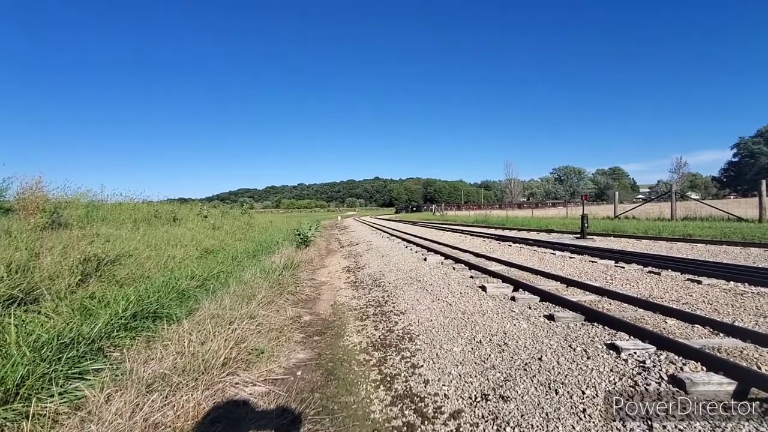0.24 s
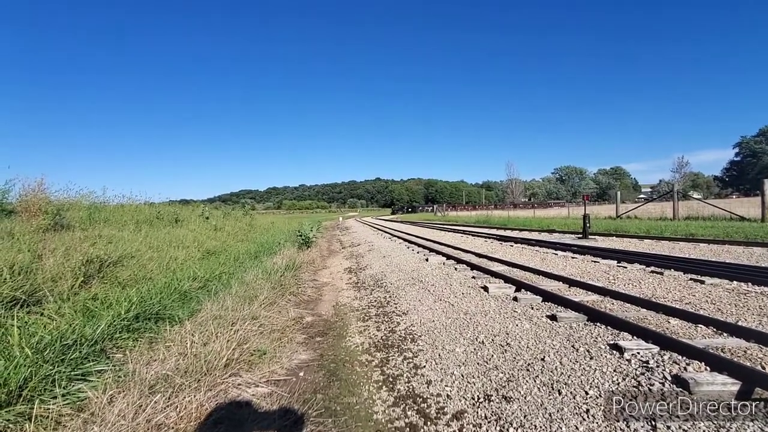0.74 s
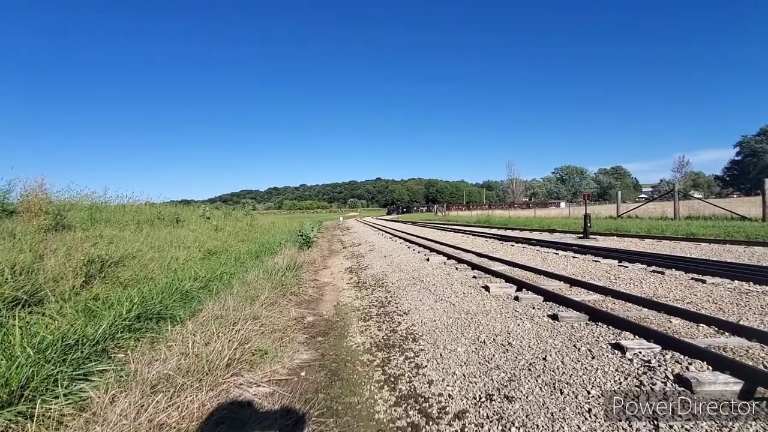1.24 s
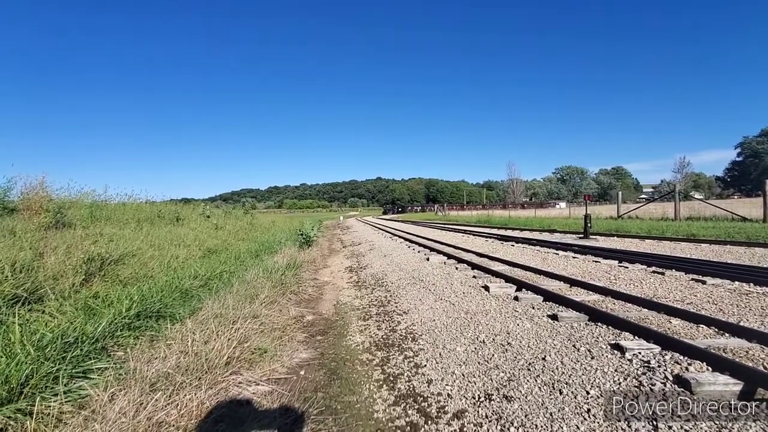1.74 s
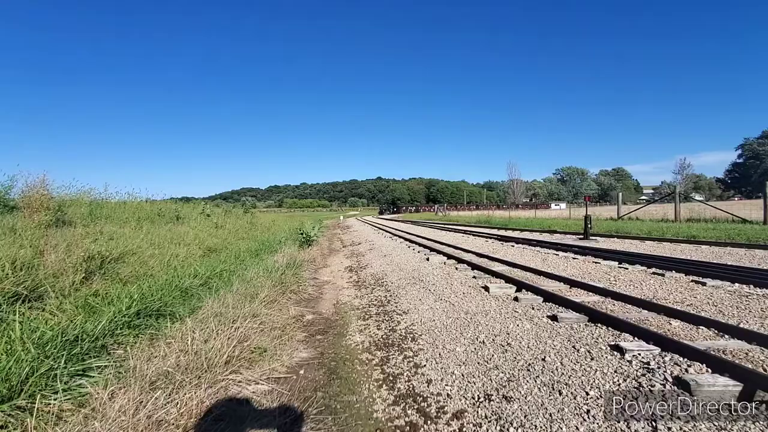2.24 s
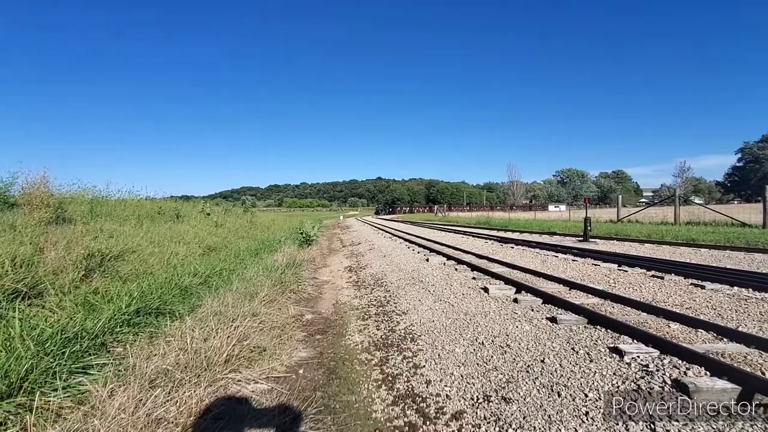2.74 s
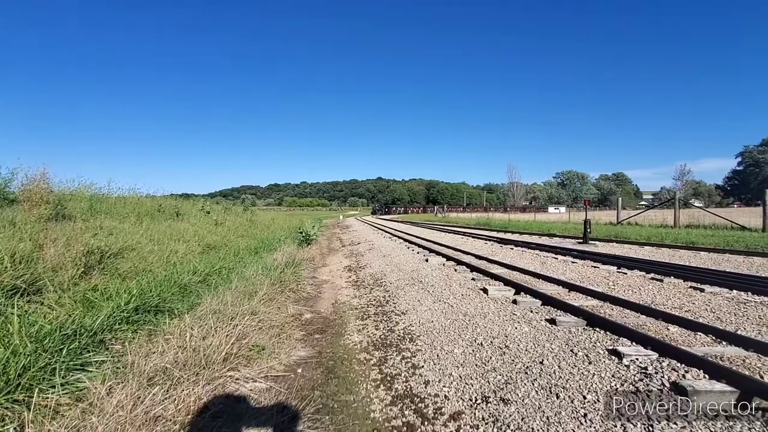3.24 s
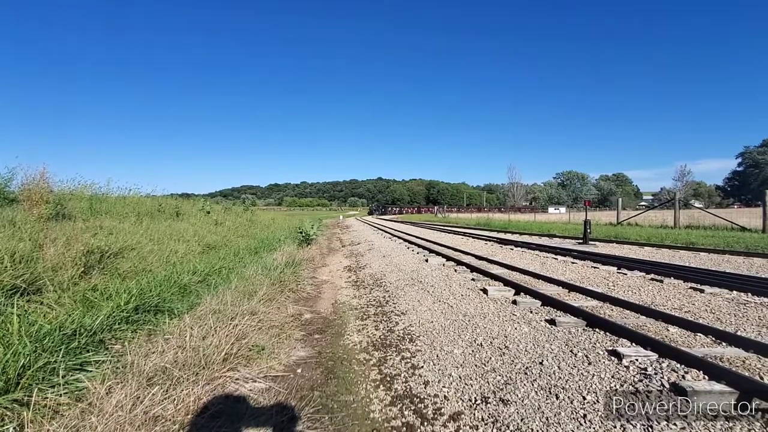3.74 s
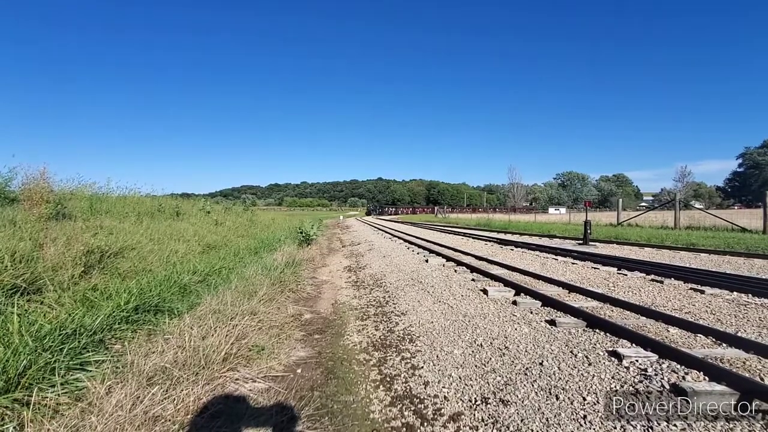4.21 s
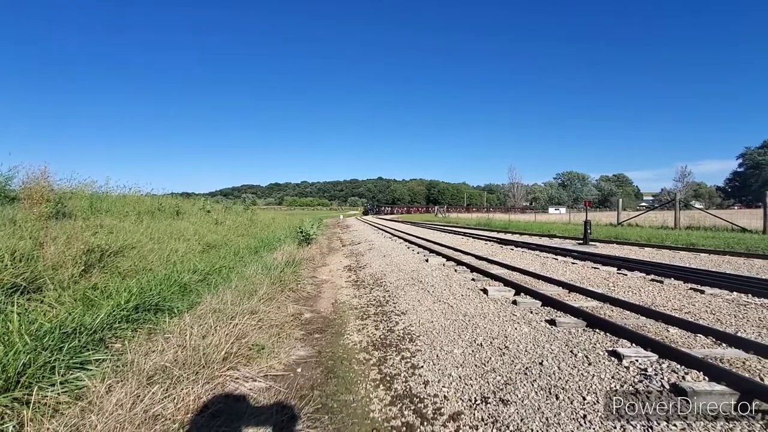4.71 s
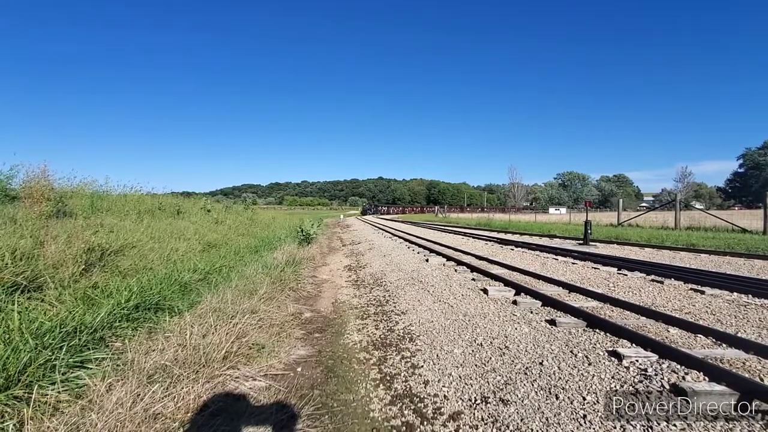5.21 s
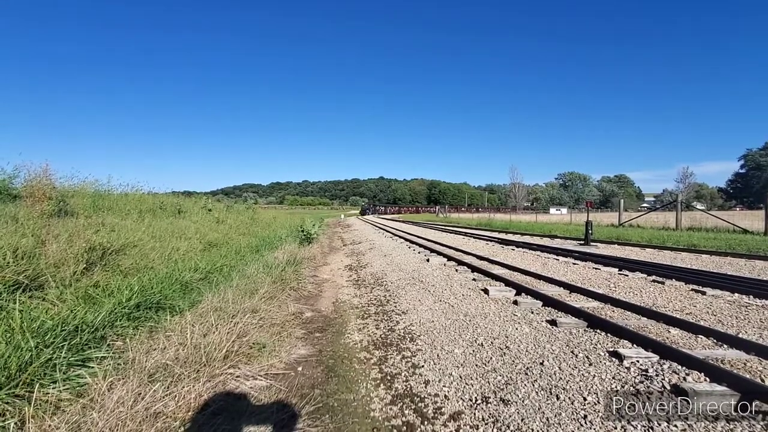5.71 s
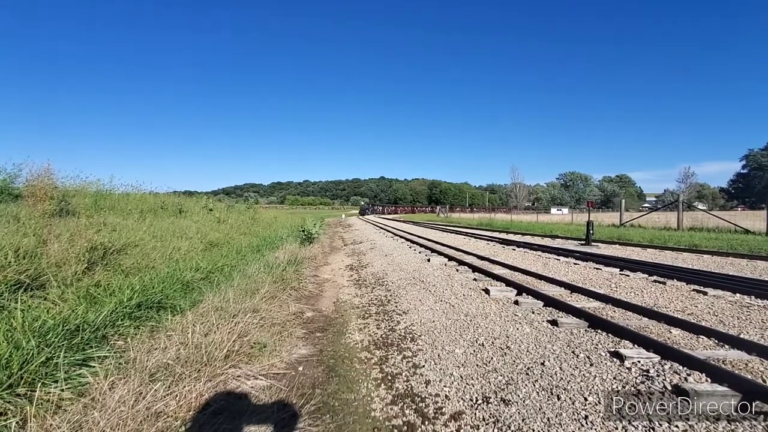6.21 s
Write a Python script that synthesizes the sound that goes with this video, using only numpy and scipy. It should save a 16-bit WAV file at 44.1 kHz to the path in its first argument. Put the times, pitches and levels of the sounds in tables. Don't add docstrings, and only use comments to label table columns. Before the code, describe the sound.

Outdoors in open grassland, a far steam locomotive chuffs quickly, about ten short hissing puffs a second. Crickets chirp and trill, small birds whistle, and low breeze rumbles over a phone's stereo microphone. After about two seconds the puffs become softer and duller. From four seconds, gusts thump the microphone and the puffing returns, swelling until it is loudest at the end.

```python
import sys
import numpy as np
from scipy import signal
from scipy.fft import rfft, irfft
from scipy.io import wavfile
from scipy.ndimage import uniform_filter1d

SR = 44100
rng = np.random.default_rng(int(sys.argv[2]) if len(sys.argv) > 2 else 0)


def rack_gain(trim_db):
    fader = np.asarray(trim_db, float)
    return 10 ** (fader / 20)


def unload_audio(sound):
    columns = np.transpose(np.atleast_2d(sound))
    steps = np.round(np.clip(columns, -1, 1) * 32767)
    wavfile.write(sys.argv[1], SR, steps.astype(np.int16))


N = 284886

# (pitch [Hz], level [dB per Hz])
MEADOW_COLOUR = [(100, -117), (400, -77.5), (1000, -100), (2500, -99), (4500, -100), (6500, -104),
                 (7300, -100), (8800, -99), (9300, -116), (12500, -124), (14000, -112), (15200, -106)]

# (time of second chirp [s], peak level [dB], pitch [Hz])
DOUBLE_CHIRPS = [(.4539, -44, 5310), (1.1491, -42.5, 5270), (1.5762, -40, 5260), (2.5764, -42.5, 5250),
                 (3.0379, -41, 5250), (3.5517, -40, 5260), (4.058, -42, 5270), (4.4482, -43, 5340),
                 (4.854, -37, 5270), (5.2623, -39.5, 5240), (5.7028, -37.5, 5260)]
LEAD_S, LEAD_DB, LEAD_HZ = 0.0416, -4, -75
# (time [s], length [s], start pitch [Hz], end pitch [Hz], level [dB])
LEFT_BIRD = [(1.432, 0.033, 3680, 3670, -52.5), (1.443, 0.065, 3480, 3520, -52),
             (1.493, 0.076, 3680, 3670, -47.5), (2.1, 0.058, 3600, 3450, -62),
             (2.142, 0.031, 3470, 3400, -56), (2.295, 0.052, 3476, 3460, -57.5),
             (2.74, 0.056, 3440, 3490, -67), (2.787, 0.041, 3660, 3700, -54),
             (2.806, .065, 3600, 3600, -63), (2.864, 0.035, 3640, 3680, -57), (2.903, .06, 3640, 3670, -58),
             (2.944, 0.057, 3660, 3620, -48.5), (3.006, 0.054, 3600, 3620, -57),
             (3.047, 0.057, 3660, 3640, -57), (3.09, .045, 3700, 3670, -62), (3.12, .045, 3660, 3640, -63),
             (3.162, 0.038, 3640, 3630, -67), (3.19, .07, 3680, 3660, -68), (3.34, .07, 3670, 3660, -70)]
RIGHT_BIRD = [(.742, .078, 3150, 3130, -39), (.845, .05, 3060, 3040, -47), (.88, .03, 3150, 3170, -46),
              (.887, .048, 3460, 3530, -41), (.96, .03, 3140, 3150, -52), (.985, .04, 3500, 3520, -52),
              (1.157, .052, 3120, 3140, -42.5), (1.897, .05, 3080, 2960, -51), (2.03, .04, 3100, 3100, -57),
              (2.84, .055, 3120, 3080, -57), (2.945, .04, 3220, 3180, -60), (3.045, .04, 3150, 3100, -61),
              (2.86, .08, 2450, 2560, -62), (2.94, .11, 2630, 2700, -59), (2.97, .07, 3050, 3100, -64)]
FAR_BIRDS = [
    (.99, .043, 1320, 1310, -50),
    (1.564, .057, 1316, 1312, -52.5),
    (1.85, .04, 4880, 4450, -63),
    (3.447, .035, 4900, 4700, -60),
    (3.468, .036, 4650, 3500, -57),
    (3.49, .036, 3700, 3300, -54),
]
# (left over right [dB], right port delay [samples])
PERCHES = [
    (3, 3),
    (-4, 5),
    (3, 7),
]

# (time [s], chirps so far [count])
TRILL_COUNTS = [
    [(0, .3), (2.98, 47.59), (3.98, 63.45), (4.47, 72.15), (6.46, 104.15)],
    [(0, -.6), (.5, 7.65), (1.49, 24.74), (2.98, 48.73), (3.98, 65.25), (6.46, 104.96)],
]
# (time [s], level [dB])
TRILL_LEVELS = [
    [(0, -62), (1.2, -65.5), (1.9, -71), (2.5, -63.5), (3.6, -66.5), (6.46, -77)],
    [(0, -69), (1.2, -64.5), (1.9, -62.5), (2.5, -72.5), (3.6, -64), (6.46, -71)],
]
# (pitch [Hz], glide [Hz], length [chirp periods], left over right [dB], overtone [dB])
TRILL_VOICES = [
    (7740, -750, .115, 4, -11),
    (8400, -300, .09, 5, -30),
]
RETURN_TURNS, RETURN_DB = .55, -9

# (pitch [Hz], level [dB])
WIND_COLOUR = [(20, -46), (40, -4), (60, -1.5), (78, 3.5), (110, -3.5), (150, -8), (220, -13), (320, -20.5),
               (500, -29), (1000, -85)]
# (pitch [Hz], width [Hz], boost [dB])
PORT_HUM = [(73.7, 13, 3), (143.3, 10, 5)]
# (time [s], likeness [-1 to 1])
WIND_LIKENESS = [(0, 0.98), (2, 0.91), (2.25, 0.29), (2.6, 1), (2.9, 0.82), (3.1, 0.52), (3.9, 0.61),
                 (4.8, -0.16), (5.1, -0.13), (6.46, -0.17)]
# (time [s], left port level [dB], right port level [dB])
BREEZE = [(0, -37, -40.5), (.5, -34, -33.5), (1.2, -34, -34.5), (2.0, -33.5, -35), (2.7, -35.5, -36),
          (3.3, -34.5, -38), (3.9, -42, -31.5), (4.3, -39.5, -40), (4.7, -31, -35), (5.1, -41.5, -37),
          (5.7, -35.5, -37.5), (6.2, -39.5, -47), (6.46, -37, -37)]
# (time [s], half length [s], left change [dB], right change [dB])
GUSTS = [(0.687, 0.088, -13, -5.5), (0.72, 0.025, 4, -22), (1.49, 0.025, -4, -15), (1.57, 0.044, -8, 4),
         (1.888, 0.028, 2, -18), (1.926, 0.025, 4, 5.5), (1.968, 0.024, -24, 1), (2.067, 0.04, 2, -9),
         (2.109, 0.047, 5, 6.5), (2.239, 0.071, 15, 12), (2.327, 0.041, -4, -2), (3.07, 0.072, 2.5, -9),
         (3.133, 0.079, 6, 4.5), (3.486, 0.022, -17, 2), (3.53, 0.11, 8.5, 7), (3.594, .03, 1, -2),
         (3.65, .05, -15, -6), (3.73, 0.054, 12, 3), (4.017, 0.056, 19, 7), (4.094, 0.058, 13, 8),
         (4.2, 0.12, 1.5, -4), (4.485, 0.047, 7.5, 8), (4.862, 0.041, -8, 9), (4.892, 0.033, 2, -8),
         (5.165, 0.045, 31.5, 14), (5.322, 0.14, 17.5, 9), (5.412, 0.032, -8, -20), (5.454, 0.035, 12, 28),
         (5.547, 0.059, 14.5, 3), (5.857, 0.043, 22, -2)]
# (time [s], pitch [Hz], half length [s], left [dB], right [dB])
THUMPS = [(1.576, 73, 0.012, -19, -23), (3.725, 71, 0.0062, -26, -24.5), (3.975, 90, 0.0072, -25, -17),
          (4.012, 88, 0.0084, -17, -16), (4.101, 109, 0.0037, -28, -16), (5.332, 101.5, 0.0088, -22, -20.5),
          (5.452, 68, 0.015, -20, -24), (5.852, 86, 0.019, -22.5, -21.5)]
# (time [s], pitch [Hz], half length [s], left [dB], right [dB])
SWEEPS = [(2.233, 68.4, 0.036, -25, -24.5), (3.643, 60.6, 0.022, -27, -29), (4.835, 90, .015, -15.5, -14),
          (4.856, 150, .011, -18, -22), (5.160, 95, .013, -18, -19), (5.288, 90, .012, -18, -17)]
SWEEP_TURNS = 0.372

# (centre [Hz], width [Hz])
BANDS = [(800, 750), (1900, 1200), (6300, 1300), (11000, 3000)]
# (rise [s], blast length [s], share of the rolling echo [ratio])
PUFF_SHAPES = [(.011, .062, 1.0), (.011, .062, .9), (.010, .055, .7), (.011, .056, .9)]
UNEVEN_DB = [.5, .6, .4, .6]
FIRST_S, GAP_S, SLOWING_S = .023, .0975, 1.3e-4
# (beat 1 [dB], beat 2 [dB], beat 3 [dB], beat 4 [dB])
CYLINDERS_DB = [(-0.55, -2.5, -2, 0.77), (0.64, -0.3, -2, 0.63), (-.7, -.7, 0, 0.29),
                (1.3, -1, -2.8, -0.045), (.3, -2.5, 0.8, 0.15), (.3, -1, -3, -0.35),
                (-0.82, -1.1, -2, 0.36), (-.7, -0.6, -1.5, -0.5), (-0.73, -0.5, -2.5, 1.3),
                (-1.9, -1.5, -2.2, 1.9), (-0.062, -1.5, -2, 0.93), (0.28, -1.6, -1.6, 1.3),
                (-0.01, -0.6, -1.1, 1.5), (-0.57, -0.4, 0.5, 0.52), (.3, -1, -0.1, 1.3),
                (0.22, -0.4, -1.4, 0.91)]
# (time [s], level [dB], treble lost in haze [dB], dip from the ground echo [dB])
APPROACH = [(0, -40, -15.5, 1), (.25, -38.5, -8.5, 2.5), (.5, -39, -9.5, -2), (.78, -39.5, -16.5, -3),
            (1.0, -40.5, -11, -3.5), (1.27, -39.5, -6.5, -9.5), (1.52, -40, -17.5, -10),
            (1.8, -43, -23.5, -10.5), (2.6, -42, -23.5, -10), (3.35, -46, -23, -12),
            (3.78, -41.5, -20, -12.5), (3.94, -40, -19, -13), (4.45, -35.5, -17, -14.5),
            (4.95, -34.5, -19.5, -12.5), (5.35, -36, -20, -9), (5.7, -32.5, -20.5, -7),
            (6.1, -33, -16, -6.5), (6.46, -27.5, -13.5, -14.5)]
TOP_HAZE, TOP_DB, TOP_HEAD_ON_DB = 0.88, 5, 8
# (time [s], head-on share [ratio], right port delay [samples], rolling echo [ratio])
TURN = [(0, 0.056, 4.67, 0.61), (1.4, 0.016, 3.84, 0.23), (2.4, 0.068, 4.55, 0.28), (3.6, 0.34, 5.3, 0.11),
        (4.6, 0.91, 7.6, 0.012), (6.46, 0.85, 7.4, 0.22)]
# (pitch [Hz], level [dB])
SIDE_ON = [(150, -22), (250, -1.5), (420, -3), (800, -3.5), (1250, -7.5), (1900, -6), (3000, 3),
           (4000, -12), (5200, 9), (5500, -7.5), (8000, -5), (12000, -10), (14000, -20), (16000, -10.5)]
HEAD_ON = [(150, 4), (250, -2), (420, -6.5), (800, 2), (1250, 0), (1900, -3.5), (3000, 10.5), (4000, 1.5),
           (5200, 10.5), (6300, 12.5), (7200, 5), (9500, -4), (12000, -4.5), (16000, -18)]
# (pitch [Hz], width [Hz], boost [dB])
CHIMNEY_RINGS = [(312, 37.3, 13), (554.6, 93, 14.5), (799.6, 75, 7.5), (1079, 115, 7.5), (1510, 133, 8.5),
                 (1660, 61, 9), (2125, 246, 11), (2425, 126, 7.5), (3520, 143, 10.5), (4096, 660, 15),
                 (5310, 43, -8), (5600, 350, 3), (6246, 112, 9), (6680, 320, 3.5)]
# (pitch [Hz], likeness [0 to 1])
STEAM_LIKENESS = [(300, .8), (600, .99), (1100, .96), (1800, .76), (2400, .86), (2900, .99), (3700, .92),
                  (4400, .8), (6200, .93), (8500, .55), (11500, .74)]
# (pitch [Hz], left over right [dB])
STEAM_LEAN = [(300, 0.5), (700, 2), (1290, 4), (2000, -4), (2700, 1.1), (3600, 2), (4700, 3.5),
              (12000, 5.5)]
# (pitch [Hz], right port lateness [radians])
HEAD_ON_BEND = [(350, 0), (860, -.3), (1700, -1.3), (2650, .08), (3150, -.15), (3750, .4), (4120, 1.6),
                (4400, -1.1), (4800, -1.4), (5200, -.3), (6550, .7), (7500, .1), (8600, -2), (10000, -3.1),
                (12000, -3.5), (14300, -6)]
SIDE_ON_BEND = [(350, 0), (1500, -.8), (2200, 0), (2900, .3), (3600, .1), (4000, -1.2), (5000, .5),
                (6000, 1.1), (6500, 3), (7000, 3.5), (7700, 2.8), (9000, 4.2), (10500, 5.6), (12000, 4.6),
                (14400, 6)]

# (from [s], to [s])
FILTER_SPANS = [
    [(0.6, 0.652), (2.269, 2.306), (3.778, 3.83), (3.835, 3.94), (4.125, 4.172), (4.534, 4.66), (4.872, 4.997)],
    [(2.932, 2.974), (3.184, 3.331), (3.339, 3.371), (3.456, 3.501), (4.212, 4.294), (4.708, 4.818), (5.202, 5.257), (5.474, 5.518), (5.584, 5.666), (5.728, 5.79), (5.97, 6.02), (6.028, 6.07), (6.11, 6.152), (6.182, 6.232), (6.242, 6.289)],
]


def read(points, hz):
    f, value = np.transpose(points)
    return np.interp(np.log(hz + 1), np.log(f + 1), value)


def evened(x):
    return x / np.sqrt(np.mean(x ** 2) + 1e-20)


def smoothed(x, size):
    return uniform_filter1d(uniform_filter1d(x, size=size), size=size)


def rings(peaks, hz):
    return sum(db / (1 + (2 * (hz - f) / width) ** 2) for f, width, db in peaks)


def add(mix, s, sound):
    part = mix[:, round(s * SR):][:, :sound.shape[1]]
    part += sound[:, :part.shape[1]]


def coloured(x, gain_db):
    return irfft(rfft(x) * rack_gain(gain_db), N)


def ports(sound, left_db, lag):
    sound = np.pad(sound, (12, 12))
    return np.array([sound * rack_gain(left_db / 2), np.roll(sound, lag) * rack_gain(-left_db / 2)])


def meadow():
    hiss = rng.standard_normal((2, N))
    return coloured(hiss, read(MEADOW_COLOUR, np.fft.rfftfreq(N, 1 / SR))) * np.sqrt(SR / 2)


def whistle(length, from_hz, to_hz, db, flutter=.45):
    size = round(length * SR)
    wobble = 1 + flutter * evened(smoothed(rng.standard_normal(SR), 150))[:size]
    glide = from_hz + (to_hz - from_hz) * np.linspace(0, 1, size) ** 2
    phase = 2 * np.pi * np.cumsum(glide) / SR
    return rack_gain(db) * wobble * np.sin(phase) * np.hanning(size) ** .6


def double_chirps():
    out = np.zeros((2, N))
    for s, db, hz in DOUBLE_CHIRPS:
        for lead in (1, 0):
            middle_hz = hz + lead * LEAD_HZ
            note = whistle(0.02, middle_hz + 120, middle_hz - 220, db + lead * LEAD_DB, flutter=0.07)
            add(out, s - lead * LEAD_S - .003, ports(note, .1, -1))
    return out


def birds():
    out = np.zeros((2, N))
    for notes, (left_db, lag) in zip((LEFT_BIRD, RIGHT_BIRD, FAR_BIRDS), PERCHES):
        for s, length, from_hz, to_hz, db in notes:
            note = whistle(length, from_hz, to_hz, db + 6)
            add(out, s, ports(note, left_db, lag if to_hz > 2000 else 0))
    return out


def trills(stray=0.055):
    t, out = np.arange(N) / SR, np.zeros((2, N))
    for counts, levels, voice in zip(TRILL_COUNTS, TRILL_LEVELS, TRILL_VOICES):
        hz, glide_hz, length, left_db, over_db = voice
        for back in (0, 1):
            turns = np.interp(t, *np.transpose(counts)) + 1.5 - back * RETURN_TURNS
            chance = rng.standard_normal((200, 3))[turns.astype(int)].T
            loud, sharp, early = chance * (1 + back)
            u = (turns % 1 - .5 + stray * early) / length
            pitch = hz + 60 * sharp + glide_hz * np.clip(u + .5, 0, 3) ** 2 / 4
            phase = 2 * np.pi * np.cumsum(pitch) / SR
            level_db = np.interp(t, *np.transpose(levels)) + 1.5 * loud + 8 + back * RETURN_DB
            stroke = rack_gain(level_db) * np.exp(-u ** 2 / 2)
            tone = np.sin(phase) + rack_gain(over_db) * np.sin(2 * phase)
            out += ports(stroke * tone, left_db, 0)[:, 12:-12]
    return out


def buffeting(t):
    when, *sides = np.transpose(BREEZE)
    db = np.array([np.interp(t, when, side) for side in sides])
    for s, half, *change_db in GUSTS:
        db += np.outer(change_db, np.maximum(1 - abs(t - s) / half, 0))
    return rack_gain(uniform_filter1d(db, size=200))


def wind(steady=.65, sharp=.33):
    t, hz = np.arange(N) / SR, np.fft.rfftfreq(N, 1 / SR)
    same = np.clip(np.interp(t, *np.transpose(WIND_LIKENESS)), -1, 1)
    one, other = coloured(rng.standard_normal((2, N)), read(WIND_COLOUR, hz) + rings(PORT_HUM, hz))
    eddies = np.array([one, same * one + np.sqrt(1 - same ** 2) * other])
    power = smoothed(eddies ** 2, 900)
    eddies = evened(eddies / power ** (steady / 2))
    out = eddies * buffeting(t)
    near = np.arange(-3000, 3000) / SR
    strong = [(*row, 0) for row in THUMPS] + [(*row, SWEEP_TURNS) for row in SWEEPS]
    for s, hz, half, left_db, right_db, late in strong:
        turn = 2 * np.pi * (hz * near - np.array([[0], [late]]))
        swing = -np.cos(turn) - sharp * np.cos(2 * turn) - sharp ** 2 * np.cos(3 * turn)
        out *= 1 - .75 * np.exp(-((t - s) / half) ** 2 / 2)
        level = rack_gain(np.array([[left_db], [right_db]]))
        add(out, s + near[0], level * swing * np.exp(-(near / half) ** 2))
    return out


def beats(count=64):
    k = np.arange(count)
    s = FIRST_S + GAP_S * k + SLOWING_S * k ** 2 / 2
    when, *controls = np.transpose(APPROACH)
    level_db, haze_db, dip_db = (np.interp(s, when, c) for c in controls)
    head_on = np.interp(s, *np.transpose(TURN)[:2])
    level_db = level_db + np.ravel(CYLINDERS_DB)
    top_db = TOP_DB + TOP_HAZE * haze_db + TOP_HEAD_ON_DB * head_on
    shares_db = [0 * s, dip_db, haze_db, top_db]
    uneven_db = (rng.standard_normal((count, len(BANDS))) * UNEVEN_DB).T
    return s, level_db + shares_db + uneven_db


def puffs(t, echo):
    s, bands_db = beats()
    since = np.maximum(t[:, None] - s + .008, 0)
    density_db = []
    for (_, width), (rise, length, share), db in zip(BANDS, PUFF_SHAPES, bands_db):
        shape = (1 - np.exp(-since / rise)) ** 2 * np.exp(-(since / length) ** 1.7)
        blasts = (shape * rack_gain(2 * db)).sum(1)
        rolling = share * np.clip(echo, 0, .4) * rack_gain(2 * np.interp(t, s + .04, db))
        density_db.append(10 * np.log10((blasts + rolling + 1e-12) * SR / 2 / width))
    return density_db


def locomotive(patchy_db=1.82, flicker_db=1.15):
    noise = rng.standard_normal((2, N))
    hz, t, (one, other) = signal.stft(noise, SR, nperseg=512, noverlap=384)
    head_on, lag, echo = (np.interp(t, TURN_COLUMN_TIMES, c) for TURN_COLUMN_TIMES, c in
                          ((np.transpose(TURN)[0], column) for column in np.transpose(TURN)[1:]))
    place = read([(f, k) for k, (f, _) in enumerate(BANDS)], hz)
    density_db = puffs(t, echo)
    field_db = sum(np.maximum(1 - abs(place - k), 0)[:, None] * db for k, db in enumerate(density_db))
    head_on = np.clip(head_on, 0, 1)
    field_db += np.outer(read(SIDE_ON, hz), 1 - head_on) + np.outer(read(HEAD_ON, hz), head_on)
    patches = uniform_filter1d(rng.standard_normal(one.T.shape), size=24, axis=0)
    patches = uniform_filter1d(patches, size=8, axis=1)
    flicker = uniform_filter1d(rng.standard_normal(len(t)), size=4)
    field_db += patchy_db * evened(patches).T + flicker_db * evened(flicker)
    same = np.clip(read(STEAM_LIKENESS, hz), 0, 1)[:, None]
    lean = rack_gain(read(STEAM_LEAN, hz))[:, None]
    delay = 2 * np.pi * np.outer(hz, lag) / SR
    bend = np.outer(read(HEAD_ON_BEND, hz), head_on)
    side_bend = np.outer(read(SIDE_ON_BEND, hz), np.clip(1 - 1.25 * head_on, 0, 1))
    late = np.exp(-1j * (delay + bend + side_bend))
    pair = np.array([one, (same * one * late + np.sqrt(1 - same ** 2) * other) / lean])
    steam = signal.istft(pair * rack_gain(field_db), SR, nperseg=512, noverlap=384)[1][:, :N]
    return coloured(steam, rings(CHIMNEY_RINGS, np.fft.rfftfreq(N, 1 / SR)) - 2.5)


def scene():
    return meadow() + double_chirps() + birds() + trills() + wind() + locomotive()


def band_limit(x):
    return signal.sosfilt(signal.butter(12, 15560, fs=SR, output="sos"), x)


def record(dry, cut_hz=270, left_in=0.083):
    t = np.arange(N) / SR
    thin = signal.sosfiltfilt(signal.butter(4, cut_hz, "high", fs=SR, output="sos"), dry)
    on = np.array([sum((t > a) & (t < b) for a, b in spans) for spans in FILTER_SPANS]).clip(0, 1)
    on = uniform_filter1d(on.astype(float), size=500) * (1 - left_in)
    return band_limit(on * thin + (1 - on) * dry)


dry = scene()
out = record(dry)
unload_audio(out)
```